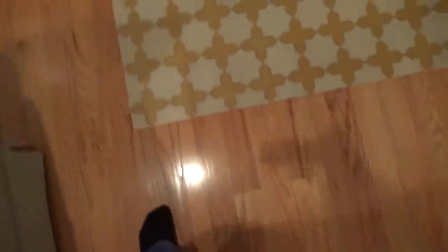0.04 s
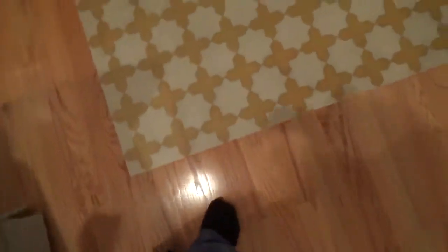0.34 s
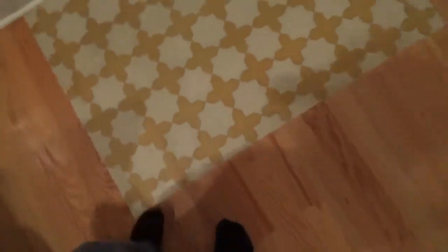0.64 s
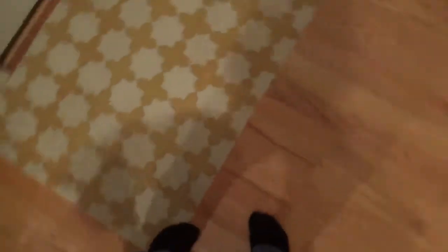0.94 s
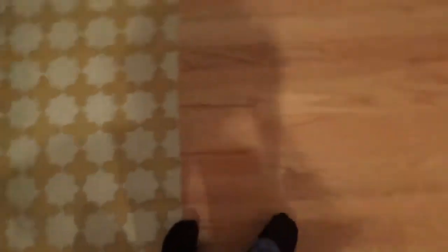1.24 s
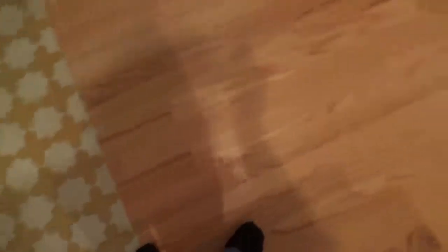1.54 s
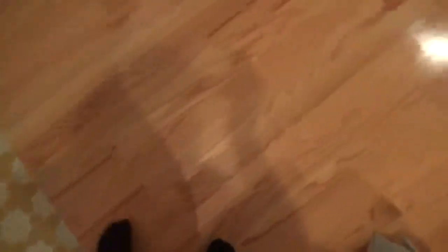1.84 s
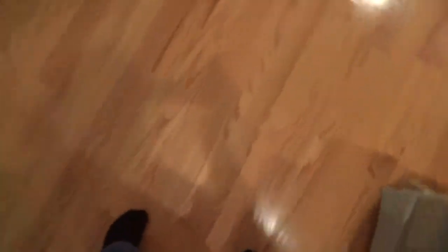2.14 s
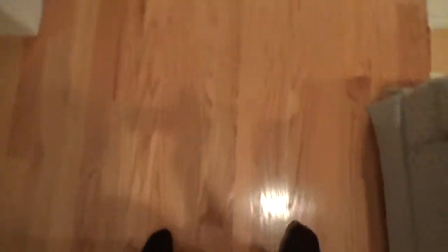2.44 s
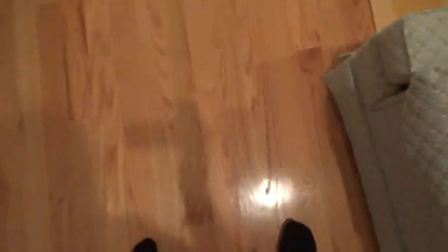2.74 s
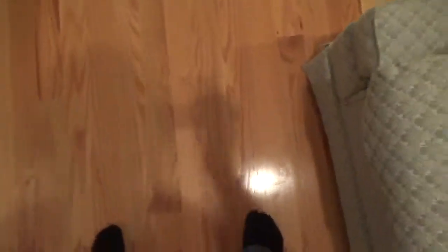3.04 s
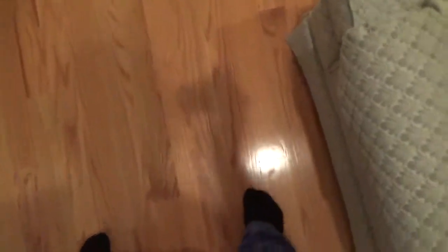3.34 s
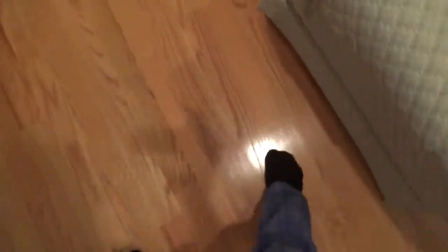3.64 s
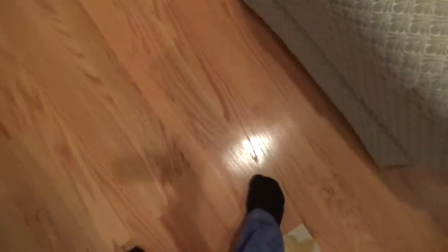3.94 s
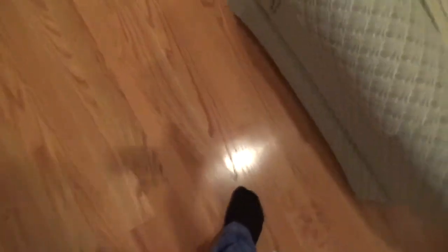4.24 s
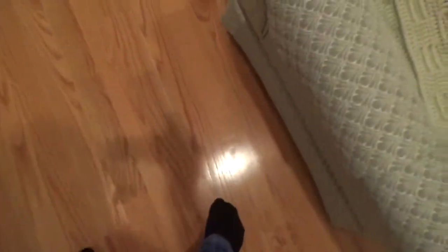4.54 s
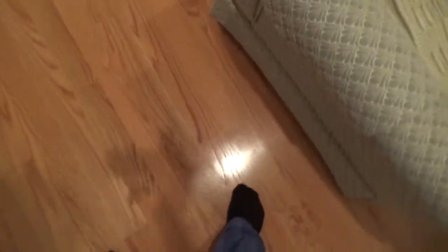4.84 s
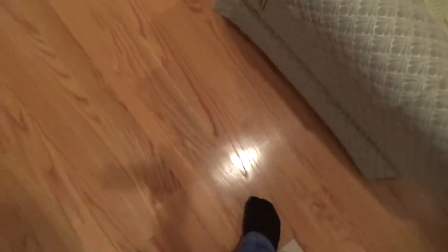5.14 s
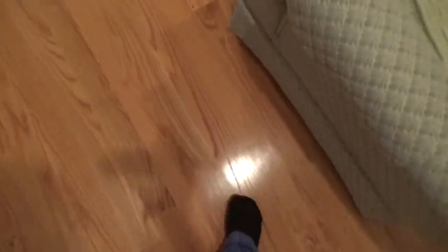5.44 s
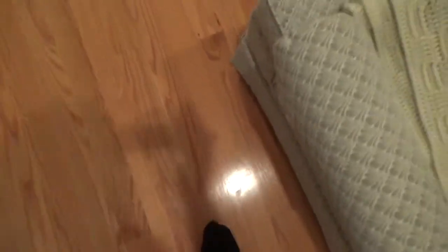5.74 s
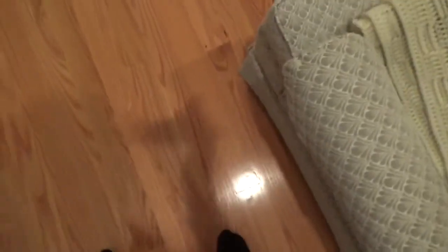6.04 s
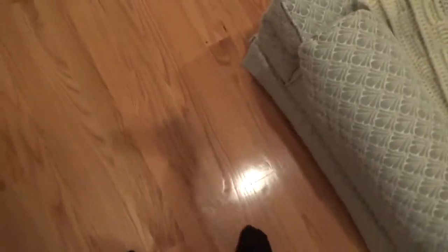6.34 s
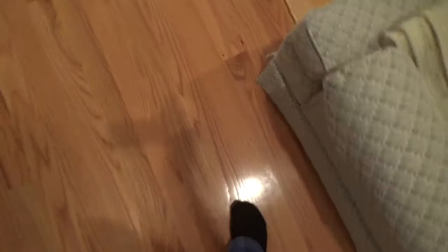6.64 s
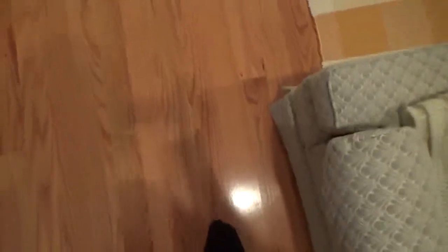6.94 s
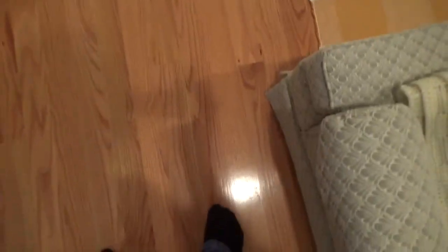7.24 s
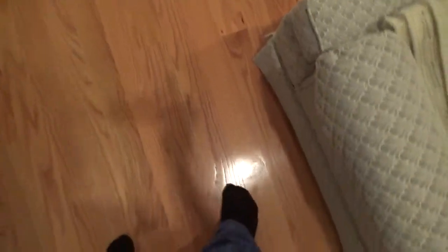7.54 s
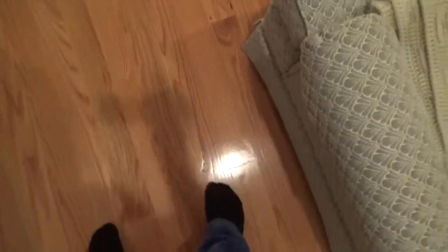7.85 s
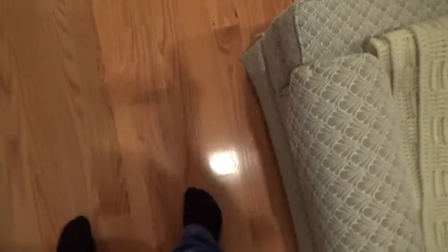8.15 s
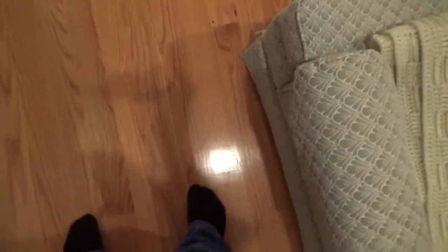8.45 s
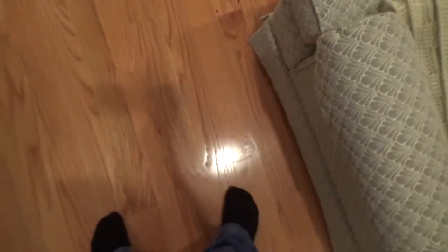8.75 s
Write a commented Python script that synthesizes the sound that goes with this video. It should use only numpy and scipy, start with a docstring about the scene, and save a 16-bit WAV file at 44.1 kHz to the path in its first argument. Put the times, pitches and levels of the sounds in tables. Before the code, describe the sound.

Wooden floorboards crack and crunch under slow sock-footed steps, with soft cloth swishes and a faint hiss.

```python
"""Socks on creaking hardwood

Someone shifts slowly over the floor of a small, quiet room, a camera in hand. Under each step the boards
slip in their joints with a cluster of dry cracks that ring the planks and the room. Socks swish, heels
thud softly, and the camera adds its own hiss and a faint 30-a-second buzz."""
import sys
import numpy as np
from scipy import signal
from scipy.fft import rfft, irfft
from scipy.io import wavfile
from scipy.ndimage import uniform_filter1d

SR = 44100
rng = np.random.default_rng(int(sys.argv[2]) if len(sys.argv) > 2 else 0)


def master(y):
    """Save y as 16-bit WAV."""
    cut = np.clip(np.atleast_2d(y).T, -1, 1)
    pcm = np.round(cut * 32767)  # scale
    wavfile.write(sys.argv[1], SR, pcm.astype(np.int16))


N = 391608
AGE = np.arange(int(.3 * SR)) / SR  # time since the start of a hit [s]
CLICK = 1. * (AGE == 0)
TOP_HZ, USUAL_SLIP_DB = 11020, -38.5  # the camera's treble limit; level of an ordinary board slip


def undb(db):
    """Decibels to gain."""
    return 10 ** (np.asarray(db) / 20)


def unit(x):
    """Scale to rms 1."""
    return x / np.sqrt(np.mean(x ** 2))


def struck(x):
    """Scale a hit to rms 1 over its first 6 ms."""
    return x / np.sqrt(np.mean(x[:int(.006 * SR)] ** 2))


def fade(t60, t=AGE):
    """Exponential decay, 60 dB down after t60."""
    return np.exp(-np.log(1000) * t / t60)


def add(track, start_s, sound):
    """Mix a sound into a track."""
    i = int(start_s * SR)
    track[i:i + len(sound)] += sound[:N - i]


def log_curve(hz, points, values):
    """Straight lines on a log-frequency axis."""
    return np.interp(np.log(hz + 1), np.log(points), values)


def colour(x, spectrum, size=1024):
    """Minimum-phase EQ through (frequency [Hz], gain [dB]) points."""
    gain = undb(log_curve(np.fft.rfftfreq(size, 1 / SR), *np.transpose(spectrum)))
    cepstrum = irfft(np.log(gain))
    cepstrum[1:size // 2] *= 2
    cepstrum[size // 2 + 1:] = 0
    return signal.fftconvolve(x, irfft(np.exp(rfft(cepstrum))))[:len(x)]


def resonate(x, hz, width_hz):
    """One resonance, gain 1 at its centre."""
    return signal.lfilter(*signal.iirpeak(hz, hz / width_hz, fs=SR), x)


def resonate_twice(x, hz, width_hz):
    """The same resonance twice in series, for steeper skirts."""
    return resonate(resonate(x, hz, width_hz), hz, width_hz)


def ring(modes, scatter_db, detune):
    """Damped modes; their strength, sign and pitch depend on the spot that is struck."""
    hz, db, t60 = np.transpose(modes)[:, :, None]
    strength, sign, pitch = rng.standard_normal((3, len(modes), 1))
    waves = np.sin(2 * np.pi * hz * (1 + detune * pitch) * AGE) * fade(t60)
    return struck(np.sum(np.sign(sign) * undb(db + scatter_db * strength) * waves, axis=0))


def burst(t60, click_db):
    """One sharp release and a short rattle of fibres, about equally strong at every pitch."""
    rattle = rng.standard_normal(len(AGE)) * fade(t60)
    spectrum = rfft(rattle / np.linalg.norm(rattle) + undb(click_db) * CLICK)
    return irfft(spectrum / np.abs(spectrum) ** .7) * fade(.1)


def spread(mid, side, side_db, apart_hz=450):
    """Mid and side to left and right; long waves reach both microphones alike."""
    side = signal.lfilter(*signal.butter(1, apart_hz, "high", fs=SR), side)
    return mid + undb(side_db) * side * np.array([[1], [-1]])


# Tone of the air and hiss bed: (frequency [Hz], relative level [dB])
HISS_EQ = [(15, -52), (25, -25), (64, -22.5), (178, -13), (202, -0.5), (235, -14), (288, -7), (619, -7.5),
           (668, -7.5), (721, -10), (798, -7.5), (2780, -11.5), (3240, -12), (3870, -14.5), (11000, -17),
           (14300, -70), (22000, -120)]
# Resonances murmuring in the bed: (centre [Hz], width [Hz], level [dB])
MURMUR_BANDS = [(213.4, 5.8, -76), (680, 13, -71), (817, 89, -69.5)]
# Stereo width of the bed: (frequency [Hz], side minus mid [dB])
BED_SIDE_EQ = [(60, -19), (110, -5), (190, -14.5), (350, -4), (630, -5.5), (1120, -0.5), (2020, -2),
               (3630, -2.5), (6520, -7.5), (11700, -12)]
def room_tone(hiss_db=-59.96):
    """Steady room air and microphone hiss, with a few low resonances."""
    def air():
        hiss = undb(hiss_db) * unit(colour(rng.standard_normal(N), HISS_EQ, size=8192))
        murmur = sum(undb(db) * unit(resonate(rng.standard_normal(N), hz, width_hz))
                     for hz, width_hz, db in MURMUR_BANDS)
        return hiss + murmur
    return air() + colour(air(), BED_SIDE_EQ) * np.array([[1], [-1]])


def camera_buzz(buzz_db=-72.5, frames_per_s=29.97, first_tick_s=.013, jitter_frames=.0004):
    """The camera ticks faintly once a frame, ringing two narrow resonances."""
    frames = np.arange(int(N / SR * frames_per_s))
    late, tick_db = rng.standard_normal((len(frames), 2)).T
    times = first_tick_s + (frames + jitter_frames * late) / frames_per_s
    ticks = np.zeros(N)
    ticks[(times * SR).astype(int)] = undb(tick_db)
    upper = resonate_twice(ticks, hz=3300, width_hz=200)
    lower = resonate_twice(ticks, hz=3070, width_hz=200)
    return undb(buzz_db) * unit(upper + undb(-4) * lower)


# Tone of cloth on varnish: (frequency [Hz], relative level [dB])
SOCK_EQ = [(200, -10), (600, -5.5), (2000, -2), (4500, -6.5), (7000, -8), (10500, -1)]
# Slides of the feet: (peak time [s], relative level [dB], length [s])
SOCK_SLIDES = [(0.31, -47.5, 0.059), (0.437, -56.5, .19), (0.94, -49, 0.24), (1.625, -53.5, .1),
               (2.19, -55, 0.16), (2.963, -56, 0.14), (3.453, -55, 0.053), (3.58, -49, .11),
               (4.255, -56, 0.071), (4.395, -52, 0.13), (4.666, -55.5, .045), (4.803, -52.5, 0.13),
               (5.59, -57, 0.25), (6.175, -49, 0.14), (6.83, -56, .11), (7.41, -57, 0.15),
               (7.825, -60.5, .085), (8.507, -56, 0.11), (8.643, -51, .057)]
def sock_swishes(trim_db=-1, grain_db=2, grain_samples=130, rise_share=.38):
    """Cloth catches and slides in countless tiny steps: a grainy hiss swelling with the foot's speed."""
    t = np.arange(N) / SR
    power = np.zeros(N)
    for peak_s, db, length_s in SOCK_SLIDES:
        offset = (t - peak_s) / length_s
        from_peak = np.maximum(-offset / rise_share, offset / (1 - rise_share))
        power += undb(db) ** 2 * np.exp(-np.minimum(from_peak ** 2.45, 20))
    grain = undb(grain_db * unit(uniform_filter1d(rng.standard_normal(N), grain_samples)))
    mid, side = (unit(colour(rng.standard_normal(N), SOCK_EQ)) for _ in range(2))
    return undb(trim_db) * np.sqrt(power) * grain * spread(mid, side, side_db=-11.5)


# Tone of a crack's woody body and of its bright snap: (frequency [Hz], relative level [dB])
WOOD_EQ = [(60, -48), (150, -38), (350, 0), (550, 1), (750, -1), (1300, -4.5), (2000, -4), (2700, -3.5),
           (3600, -7), (6000, -24)]
SNAP_EQ = [(100, -68), (1500, -1), (2800, -13), (4000, 3), (5600, -1.5), (7500, -4.5), (10500, 2)]
# Ring of a plank and of the floor on its joists: (pitch [Hz], relative level [dB], t60 [s])
PLANK_MODES = [(693, 14.5, 0.019), (920, -5.5, 0.056), (1183, 5.5, 0.045), (1298, -1, 0.11),
               (1534, 13.5, 0.014), (1713, 6, 0.021), (2130, -35, 0.01), (2500, -49, 0.06),
               (2860, -25, 0.06)]
JOIST_MODES = [(183, -10.5, 0.11), (256, 0, 0.06), (306, -14, 0.24), (363, 2, 0.077), (520, 1.5, 0.0041)]
# Slips, clustered at each shift of weight: (time [s], plank level [dB], plank centre [Hz], snap level [dB])
BOARD_SLIPS = [(.398, -49.5, 1300, -57), (.568, -48.5, 1970, -56.5), (.641, -57, 1830, -60),
               (1.000, -42, 900, -41), (1.0054, -41, 1500, -45), (1.039, -42.5, 1500, -47),
               (1.579, -54.5, 1540, -60), (1.643, -47.5, 1550, -56.5), (2.196, -43.5, 1650, -45),
               (2.206, -45, 1400, -51), (2.247, -42.5, 1600, -46), (2.937, -52, 1220, -58),
               (3.592, -43, 1150, -48), (3.616, -35.5, 1600, -39), (3.649, -40.5, 1540, -46.5),
               (4.370, -53.5, 1500, -50), (4.388, -59, 2050, -49), (4.7669, -42.5, 1740, -48),
               (4.777, -37.5, 1300, -42), (4.791, -41, 1480, -54), (5.610, -53, 1840, -61),
               (5.714, -51.5, 1480, -45.5), (6.160, -25.5, 1350, -33), (6.172, -44, 1300, -41),
               (6.190, -37, 1650, -40), (7.322, -43, 1540, -53), (7.329, -43, 1270, -48),
               (7.336, -41, 1260, -47.5), (7.352, -39, 1220, -46), (7.4054, -37.5, 2230, -41.5),
               (8.459, -46, 1700, -51.5), (8.465, -41, 1160, -58), (8.480, -39.5, 1250, -52),
               (8.534, -37, 1890, -43), (8.563, -42.5, 1400, -41.5)]
def board_cracks(even_snap_hz=7100, snap_db_per_octave=15, body_lag_s=.0004, recover_s=.12, cut_hz=138):
    """Each slip snaps, rings the plank and knocks the floor; returns direct sound and reverb send."""
    direct, send = np.zeros(N), np.zeros(N)
    wood_click, snap_click = struck(colour(CLICK, WOOD_EQ)), colour(CLICK, SNAP_EQ)
    pauses = np.abs(np.diff([slip[0] for slip in BOARD_SLIPS], prepend=0))
    for (start_s, plank_db, plank_hz, snap_db), pause_s in zip(BOARD_SLIPS, pauses):
        # the snap brightens as it gains on the plank
        snap_hz = min(even_snap_hz * 2 ** ((snap_db - plank_db) / snap_db_per_octave), TOP_HZ)
        modes = undb(-4) * ring(PLANK_MODES, scatter_db=7.5, detune=.017)
        knock_db = plank_db - 19 + .21 * (plank_db - USUAL_SLIP_DB)  # strong slips carry more low end
        knock = undb(knock_db) * ring(JOIST_MODES, scatter_db=3, detune=.0067)

        def body(push):
            return undb(plank_db) * struck(resonate(push + modes, plank_hz, width_hz=1700)) + knock

        def snap(push):
            return undb(snap_db) * struck(resonate(push, snap_hz, width_hz=6500))

        # bending waves run faster the higher they are, so the snap comes first
        add(direct, start_s, snap(colour(burst(t60=.007, click_db=-4), SNAP_EQ)))
        add(direct, start_s + body_lag_s, body(struck(colour(burst(t60=.017, click_db=-2), WOOD_EQ))))
        # a step's first slip flexes the whole board; the next stay in the joint and stir the room less
        send_db = -.53 - 2 * np.exp(-pause_s / recover_s)
        # clean clicks feed the room, so the tail's tone stays smooth and even
        add(send, start_s, undb(send_db) * (body(wood_click) + undb(-1) * snap(snap_click)))
    # a narrow board radiates no deep bass
    return signal.sosfilt(signal.butter(5, cut_hz, "high", fs=SR, output="sos"), [direct, send])


# Crunching runs of many tiny slips, mostly joints giving way; the run at 6.122 s is a faint rustle swelling
# just before the loudest crack: (time [s], length [s], level [dB], centre [Hz])
JOINT_RUNS = [(0.994, 0.015, -41.5, 840), (1.035, 0.023, -51, 824), (2.145, .05, -58.5, 1200),
              (3.604, 0.024, -54, 1300), (4.371, .13, -61.5, 2300), (4.766, 0.031, -49, 1350),
              (6.122, 0.062, -52, 1400), (7.337, .016, -42.5, 1380), (8.462, .014, -46, 1180)]
def joint_crunches(slips_per_s=900, scatter_db=3, usual_width_share=.22, db_per_doubling=12):
    """Tongue and groove stick and slip in a run that swells and dies, driving one board resonance; the same
    sound gives the faint rustle swelling before the loudest crack."""
    out = np.zeros(N)
    for start_s, length_s, db, hz in JOINT_RUNS:
        slipping = rng.random(len(AGE)) < slips_per_s / SR
        slips = slipping * undb(scatter_db * rng.standard_normal(len(AGE)))
        load = np.sin(np.pi * np.minimum(AGE / length_s, 1))
        # a fainter crunch locks less to the board, so its band is wider
        width_hz = usual_width_share * hz * 2 ** ((USUAL_SLIP_DB - db) / db_per_doubling)
        run = resonate(colour(slips * load, WOOD_EQ), hz, width_hz)
        add(out, start_s, undb(db) * run * np.sqrt(length_s * SR) / np.linalg.norm(run))
    return out


def floor_shake(hz, t60, rise_cycles=.32):
    """The floor shakes around one pitch, swells over part of a cycle and dies away."""
    rumble = resonate_twice(rng.standard_normal(len(AGE)), hz, width_hz=.85 * hz)
    # the foot sets the strength of the shaking; only its pitch wanders
    shaking = np.cos(np.angle(signal.hilbert(rumble)))
    push = (1 - np.exp(-AGE * hz / rise_cycles)) * fade(t60)
    return resonate(shaking * push / push.max(), hz, width_hz=2 * hz)


# Soft blows of heel and sole: (time [s], level [dB], centre [Hz], t60 [s])
FOOTFALLS = [(1.01, -67.5, 75, 0.47), (1.135, -56, 75, .15), (1.181, -50.5, 99, 0.16),
             (1.23, -46, 108, 0.079), (1.405, -48, 97, 0.048), (2.122, -66, 75, 0.21),
             (3.795, -58, 350, 0.08), (4.28, -53.5, 212, 0.4), (5.5328, -32.5, 543, 0.039),
             (5.54, -43, 204, 0.12), (5.564, -47, 317, .045), (6.756, -52.5, 169, 0.14)]
def foot_thuds(joist_db=1.5, sway_hz=60, sway_t60=.51, sway_db_per_octave=-14):
    """A padded foot lands: a hard, quick contact rings the joists, a soft, slow one sways the floor."""
    out = np.zeros(N)
    for start_s, db, hz, t60 in FOOTFALLS:
        modes = ring(JOIST_MODES, scatter_db=1.5, detune=.01)
        joists = undb(joist_db) * resonate_twice(modes, hz, width_hz=.6 * hz)
        blow = floor_shake(hz, t60)
        sway_db = -9 + sway_db_per_octave * np.log2(hz / sway_hz)
        sway = undb(sway_db) * floor_shake(sway_hz, sway_t60)
        add(out, start_s, undb(db) * (blow + joists + sway))
    return out


# Close-up ticks: (time [s], level [dB])
CLOSE_TICKS = [(6.789, -55), (6.8186, -55), (6.8544, -54.5), (6.8893, -42)]
def dry_ticks(snap_db=-3):
    """Thin snaps with one short ring each, too near the camera to stir the room."""
    out = np.zeros(N)
    for start_s, db in CLOSE_TICKS:
        body_push = colour(burst(t60=.052, click_db=-1), WOOD_EQ)
        snap_push = colour(burst(t60=.0063, click_db=-14), SNAP_EQ)
        body = struck(resonate(body_push, hz=1750, width_hz=900))
        snap = struck(resonate(snap_push, hz=8000, width_hz=7000))
        add(out, start_s, undb(db) * (body + undb(snap_db) * snap))
    return out


# Small-room reverb, band by band: (frequency [Hz], relative level [dB], t60 [s])
REVERB_BANDS = [(60, 6, .3), (191, 4, 0.29), (350, 2, 0.53), (796, 0.5, 0.54), (1500, -1.5, 0.68),
                (2300, 0, 0.64), (4500, -0.5, 0.63), (7700, -1, 0.27), (11500, -9.5, 0.18)]
def room_reverb(send, wet_db=1, build_s=.0017, early_db=2, early_t60=.058, clump_db=4):
    """Floor and furniture return quick reflections, the walls a dense tail whose treble dies first."""
    t = np.arange(int(.8 * SR)) / SR
    hz, db, t60 = np.transpose(REVERB_BANDS)
    freqs = np.fft.rfftfreq(len(t), 1 / SR)
    early = fade(early_t60, t)
    onset = 1 - np.exp(-(t / build_s) ** 2)

    def reflections():
        noise = rng.standard_normal(len(t))
        clumps = undb(clump_db * np.sqrt(early) * rng.standard_normal(len(t)))
        spectrum, response = rfft(noise * clumps), 0
        for share, band_db, band_t60 in zip(np.eye(len(hz)), db, t60):
            band = irfft(spectrum * log_curve(freqs, hz, share), len(t))
            envelope = (fade(band_t60, t) + undb(early_db) * early) * onset
            response += undb(band_db) * band * envelope / np.linalg.norm(envelope)
        return signal.fftconvolve(send, response)[:N]
    return undb(wet_db) * spread(reflections(), reflections(), side_db=-9)


def scene(thud_send_db=-7, sock_send_db=-5, crunch_send_db=-3):
    """The floor lies below the two close microphones, which hear nearly the same direct sound."""
    cracks, send = board_cracks()
    direct = cracks + dry_ticks()
    thuds, socks, crunches = foot_thuds(), sock_swishes(), joint_crunches()
    # scatter from legs and hand differs a little between the microphones
    scatter = rng.standard_normal(len(AGE)) * fade(.012)
    scattered = signal.fftconvolve(direct, scatter / np.linalg.norm(scatter))[:N]
    near = spread(direct, scattered, side_db=-16)
    send += undb(crunch_send_db) * crunches + undb(thud_send_db) * thuds + undb(sock_send_db) * socks[0]
    return near + crunches + thuds + socks + room_reverb(send) + room_tone() + camera_buzz()


def record(dry):
    """The camera cuts the top steeply."""
    return signal.sosfilt(signal.ellip(10, .2, 70, TOP_HZ, fs=SR, output="sos"), dry)


dry = scene()
out = record(dry)
master(out)
```